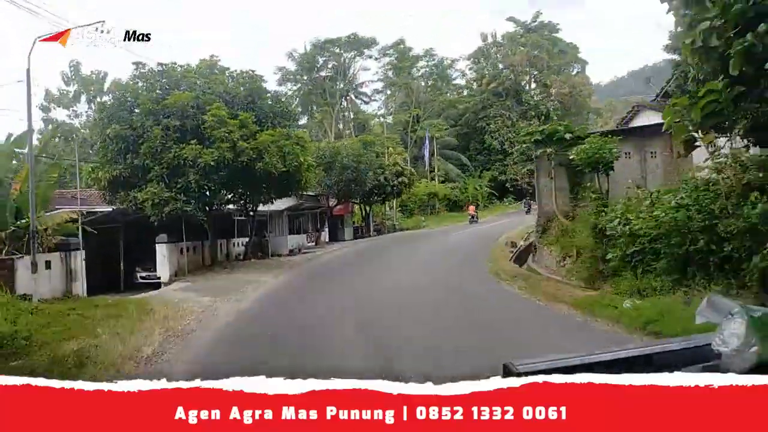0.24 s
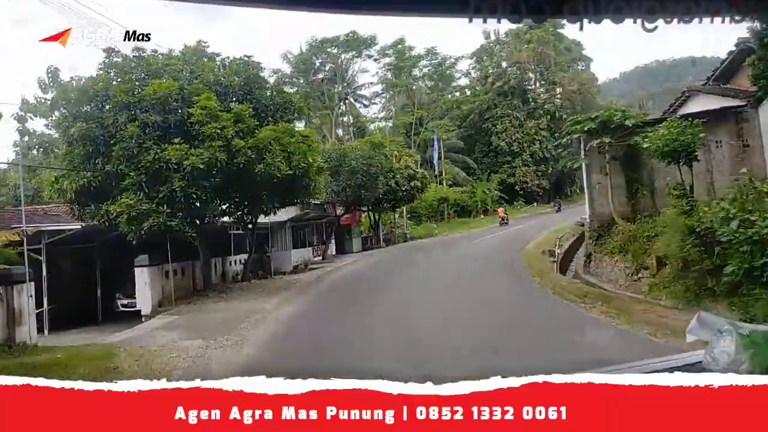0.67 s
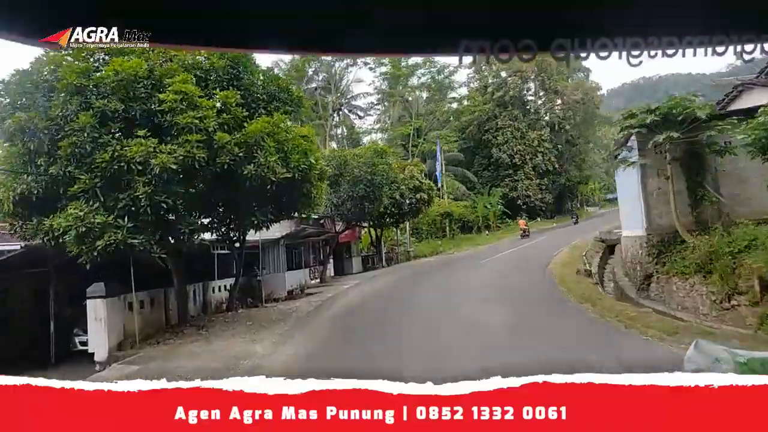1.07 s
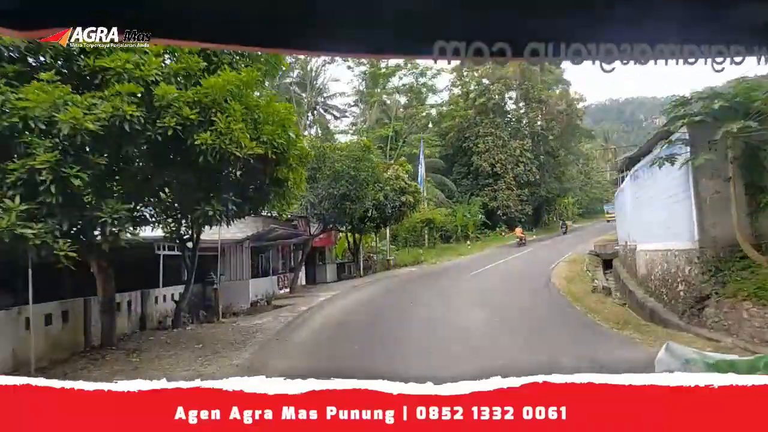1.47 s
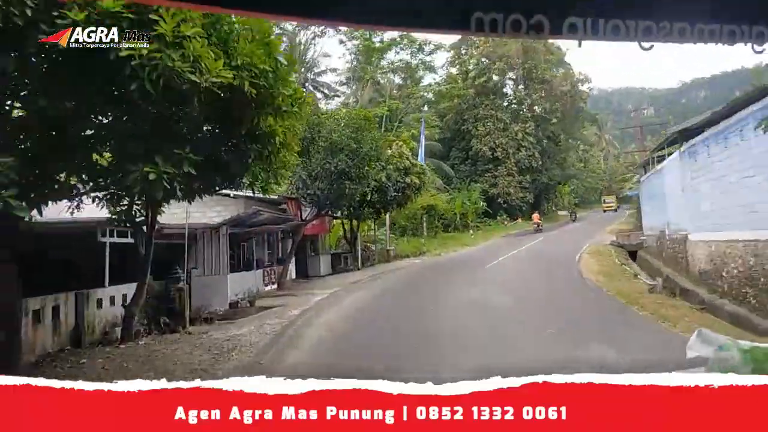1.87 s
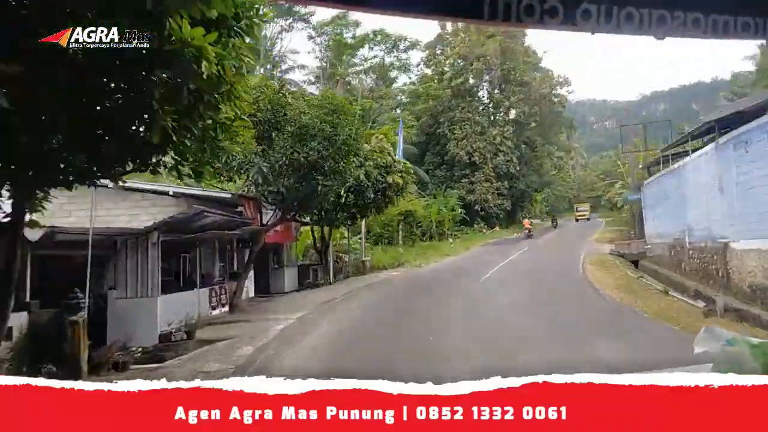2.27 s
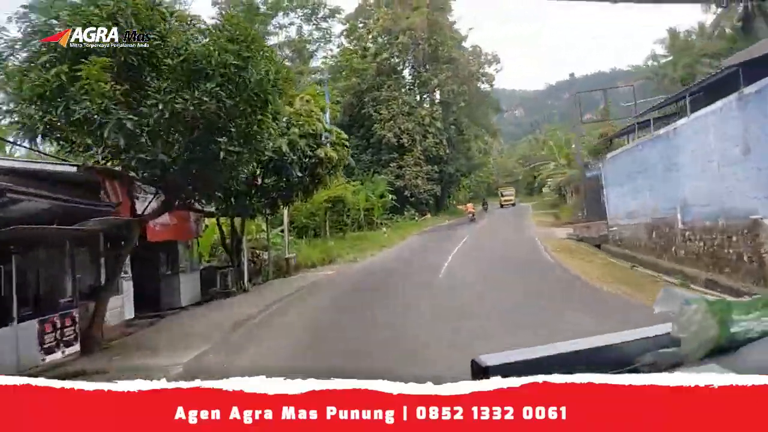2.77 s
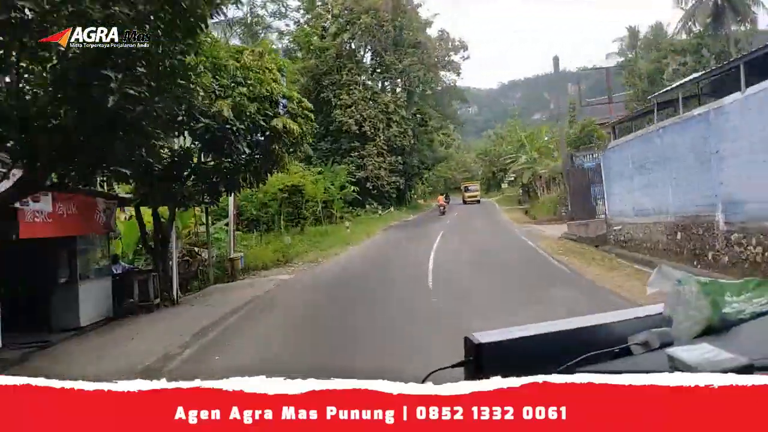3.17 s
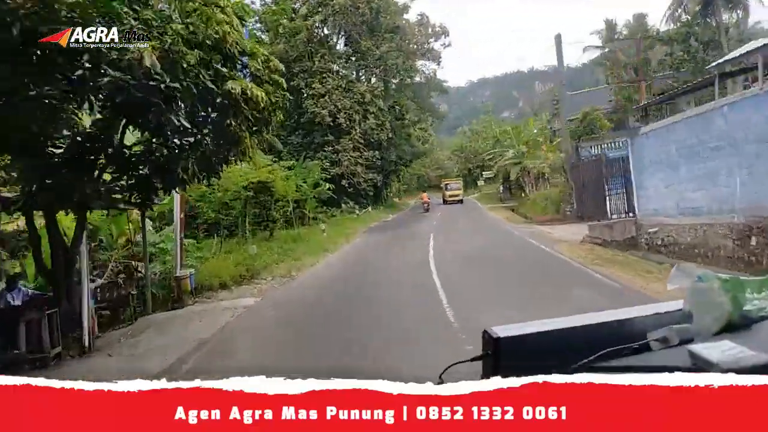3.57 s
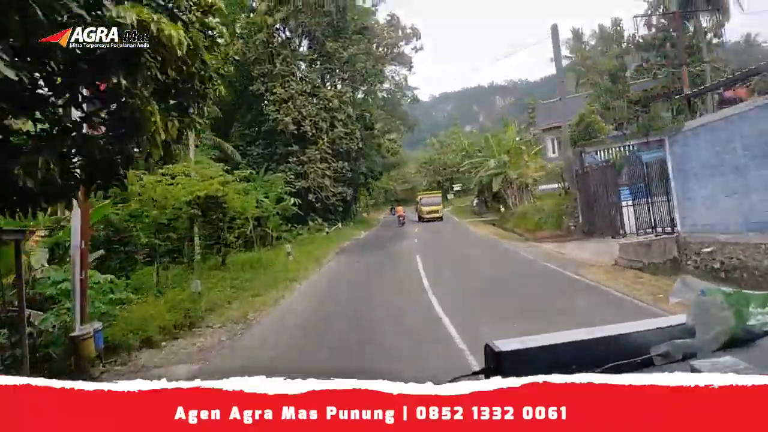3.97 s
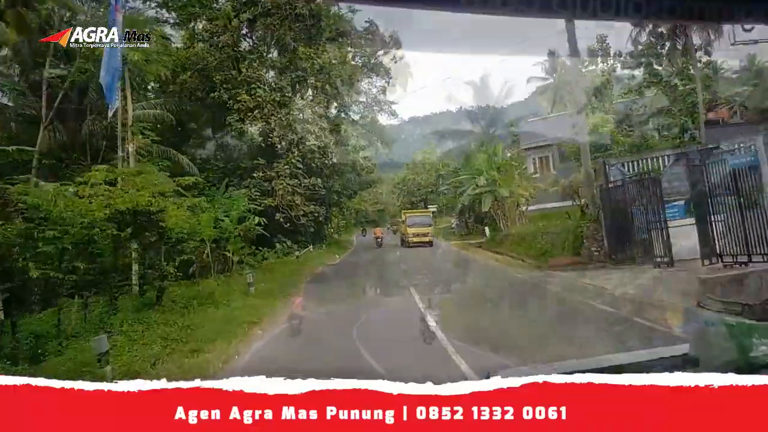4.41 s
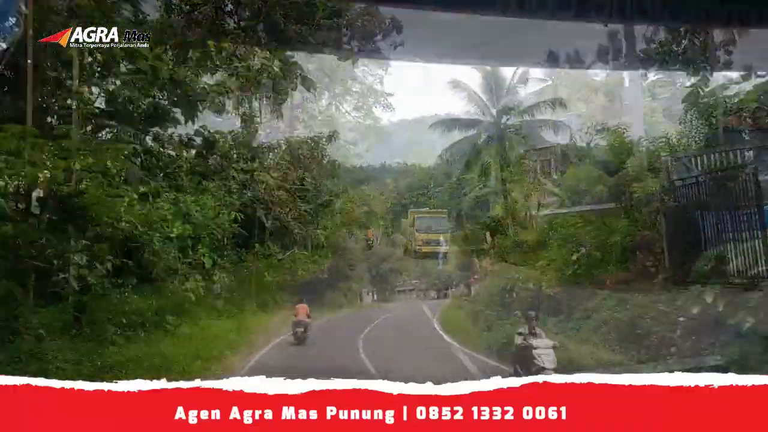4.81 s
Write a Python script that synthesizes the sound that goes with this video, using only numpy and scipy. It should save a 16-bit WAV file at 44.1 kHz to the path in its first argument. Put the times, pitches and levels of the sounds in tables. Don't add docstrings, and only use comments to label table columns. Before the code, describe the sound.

Steady bus interior noise heard from the dashboard: a deep throbbing diesel drone with muffled exhaust rush and faintly humming panels. It sags slightly, then swells and rises a little in pitch as the bus pulls, easing off after four and a half seconds. Soft body thumps, smooth tyre roar and light hiss surround it, with tiny trim clicks and short high squeaks near the end.

```python
import sys
import numpy as np
from scipy import signal
from scipy.fft import rfft, irfft, next_fast_len
from scipy.io import wavfile
from scipy.ndimage import uniform_filter1d

SR = 44100
rng = np.random.default_rng(int(sys.argv[2]) if len(sys.argv) > 2 else 0)


def linear_from_db(decibels):
    return 10 ** (np.asarray(decibels, float) / 20)


def pcm_store(signal):
    levels = np.round(np.clip(np.atleast_2d(signal), -1, 1) * 32767)
    wavfile.write(sys.argv[1], SR, levels.astype(np.int16).T)


N = 222602
T = np.arange(N) / SR

# time in seconds, four-stroke cycles per second.
ENGINE_SPEED = [(0.0, 12.21), (0.5, 12.08), (1.0, 12.0), (1.5, 12.11), (2.0, 12.32), (2.5, 12.49),
                (3.0, 12.76), (3.5, 12.93), (4.0, 13.06), (4.5, 13.08), (5.05, 13.23)]
# time in seconds, rms level in dB.
FIRING_LEVEL = [(0.0, -31), (0.2, -31), (0.4, -50), (0.55, -34), (0.68, -37), (0.88, -34.5), (1.38, -34),
                (1.6, -56), (1.78, -31.5), (2.0, -29), (2.25, -25), (2.7, -27), (3.5, -26), (3.72, -39),
                (4.02, -26), (4.22, -37.5), (4.4, -35), (5.05, -34.5)]
# multiple of the cycle rate, then level in dB coasting, pulling and cruising.
ENGINE_TONES = [(2, -38.5, -27, -33.5), (3, -42.5, -43.5, -36.5), (5, -49.5, -55.5, -39),
                (7, -42.5, -54, -38.5), (8, -54, -50.5, -56.5), (9, -46.5, -43, -46.5),
                (10, -54, -49.5, -45), (12, -50.5, -56.5, -66), (16, -79.5, -47, -53.5),
                (17, -60.5, -51.5, -63), (20, -54, -52.5, -52), (22, -58, -59.5, -58.5),
                (26, -62, -61, -58.5), (27, -57, -61, -51), (30, -58, -58.5, -60), (36, -75, -60.5, -89)]
# time in seconds, stage (0 coasting, 1 pulling, 2
# cruising), overall level in dB.
DRIVING = [
    (0, -0.3, 1),
    (1.6, 0, 0),
    (2.0, 1.5, 2),
    (3.1, 1.5, 1.5),
    (3.5, 1.5, 0.5),
    (4.1, 2, 1.5),
    (4.5, 2.11, -2.5),
    (5.05, 2.04, -7.5),
]
# frequency in Hz, level in dB per Hz.
BOOM_COLOUR = [(3, -14), (10, -10.5), (16, -8), (22, 2.5), (30, -9.5), (40, -14.5), (52, -30.5), (70, -38)]
RUMBLE_COLOUR = [(35, -20.5), (55, -2.5), (85, 6), (100, -8.5), (140, -7.5), (175, -11.5), (210, -11),
                 (260, -16), (350, -18), (420, -23.5), (650, -27)]
EXHAUST_COLOUR = [(300, -20), (430, 0), (600, 0.5), (750, -0.5), (950, 0), (1100, -4.5), (1300, -2),
                  (1600, -15), (2200, -37.5)]
TYRE_COLOUR = [(1000, -6), (1400, -3), (1800, 1.06), (2300, 1.2), (2600, -3), (3000, -11), (3700, -21.5),
               (4800, -34), (6500, -43), (8500, -47), (16000, -54)]
HISS_COLOUR = [(2500, 7), (4500, -4), (7000, -10.5), (8600, -12.5), (10500, -1.8), (12600, -4.5),
               (13400, -8.5), (15700, -8), (17000, -31)]
# time in seconds, peak of the bright part in dB, level of the dull part in dB.
TRIM_TICKS = [(.031, -53.5, -77.5), (.2, -64, -80), (.492, -60, -78), (.66, -64, -82), (.7, -75.5, -87),
              (.93, -69, -80), (1.0, -64, -83), (1.08, -66, -82), (1.345, -68, -73.5), (1.43, -71, -76),
              (1.62, -58.5, -74.5), (1.97, -68, -78), (2.15, -57, -68), (2.268, -52, -68.5),
              (2.497, -61, -85), (2.76, -64, -81), (2.797, -57, -79), (3.372, -63, -71), (3.52, -64.5, -69),
              (3.692, -58, -69), (3.948, -64, -71.5), (4.77, -61.5, -68), (5.029, -61, -80)]
# start in seconds, length in seconds, pitch in Hz, rms level in dB, roughness (0 to 1).
TRIM_SQUEAKS = [(2.01, .08, 1875, -49, .3), (2.265, .14, 1900, -51, .2), (4.22, .12, 1630, -53, .15),
                (4.33, .1, 1640, -49.5, .2), (4.4, .07, 2250, -53, .3), (4.5, .06, 2470, -52, .15),
                (4.755, .04, 2595, -42, .5), (4.799, .014, 2580, -43, .4), (4.745, .07, 2200, -48, .95),
                (4.77, .045, 3250, -57, .95), (4.94, .04, 2840, -51, .5), (4.975, .045, 2270, -47, .6),
                (4.975, .09, 2460, -45, .9), (4.99, .08, 2830, -52, .9), (5.02, .04, 1835, -48, .4),
                (4.98, .08, 3400, -56, .8), (4.8, .2, 595, -54, .2)]
# pitch in Hz, width in Hz, level in dB against the rush.
HUMMING_PANELS = [(599.6, 10, -16), (673, 14, -12), (921.5, 6.9, -15), (976, 18, -19), (1327, 21, -17.5),
                  (1393, 7, -15), (1819, 20, -15)]
# multiple of the cycle rate, centre in Hz,
# half width in Hz, rms level on top in dB.
CAB_RESONANCES = [(15, 195.5, 3.3, -45.5), (18, 217.5, 4.0, -43), (18, 227, 4.96, -45),
                  (24, 290, 3.8, -53.5), (24, 297.5, 4.7, -48), (24, 312, 3.1, -49.5)]
# time in seconds, level at the top in dB.
ROAD_BUMPS = [(.07, -22.5), (.27, -18), (.42, -24.5), (.53, -27), (.66, -18), (.94, -22), (1.08, -31.5),
              (1.27, -26.5), (1.39, -27.5), (1.72, -24), (1.82, -24.5), (1.99, -22), (2.16, -17.5),
              (2.37, -16.5), (2.5, -18.5), (2.7, -21), (2.8, -17.5), (2.95, -20.5), (3.07, -23.5),
              (3.18, -21.5), (3.31, -14), (3.502, -17), (3.73, -27), (3.88, -22.5), (4.08, -16.5),
              (4.15, -20.5), (4.3, -22), (4.57, -27), (4.69, -25), (4.92, -25.5)]
# time in seconds, frequency in Hz.
BOOM_PITCH = [(0, 24.5), (0.5, 26.5), (0.8, 23.6), (2.7, 23.5), (2.9, 21), (3.2, 23), (3.5, 22),
              (4.05, 23.4), (4.2, 19.6), (4.7, 20), (5.05, 24.5)]
# time in seconds, level in dB.
ROAD_PULL = [(0, -55.5), (1.1, -56.5), (1.58, -59), (1.72, -55), (1.8, -50), (2.05, -45.5), (2.22, -46.5),
             (2.32, -44.5), (2.66, -46), (2.8, -41.5), (3.1, -41), (3.17, -44), (3.35, -40.5),
             (3.78, -42.5), (4.0, -39), (4.31, -45), (4.55, -44), (5.05, -42)]


def in_time(rows):
    s, *columns = np.transpose(rows)
    return [np.interp(T, s, column) for column in columns]


def rms_one(x):
    return x / np.sqrt(np.mean(x ** 2) + 1e-20)


def drift(rate_hz):
    r = np.exp(-2 * np.pi * rate_hz * 40 / SR)
    white = rng.standard_normal(N // 40 + 2002)
    slow = signal.lfilter([1], [1, -2 * r, r * r], white)[2000:]
    return np.interp(np.arange(N) / 40, np.arange(len(slow)), rms_one(slow - slow.mean()))


def coloured(colour, patchy_db, rate_hz):
    size = next_fast_len(N)
    octave = np.log2(np.maximum(np.arange(size // 2 + 1) * SR / size, 1))
    hz, db = np.transpose(colour)
    shape = linear_from_db(np.interp(octave, np.log2(hz), db, left=-90, right=-90))
    noise = rfft(rng.standard_normal(size)) * shape
    out = np.zeros(N)
    lowest = np.floor(np.log2(hz[0] * .95))
    for centre in np.arange(lowest, 14.5, .5)[:14]:
        share = np.clip(1 - 2 * np.abs(octave - centre), 0, 1)
        out += irfft(noise * share, size)[:N] * linear_from_db(patchy_db * drift(rate_hz))
    return rms_one(out)


def hum(white, hz, width_hz):
    r = np.exp(-np.pi * width_hz / SR)
    section = [1, 0, -1, 1, -2 * r * np.cos(2 * np.pi * hz / SR), r * r]
    return rms_one(signal.sosfilt([section, section], white))


def follow(level_db, pull_share, engine_share):
    pull_db, = in_time(ROAD_PULL)
    _, overall_db = in_time(DRIVING)
    mean_pull_db = -48
    return level_db + pull_share * (pull_db - mean_pull_db) + engine_share * overall_db


def air_hiss():
    level_db = follow(-73.5, pull_share=.28, engine_share=.1) + 3.5
    return linear_from_db(level_db) * coloured(HISS_COLOUR, patchy_db=1.5, rate_hz=6.8)


def floor_rumble():
    level_db = follow(-36, pull_share=.14, engine_share=1.05) + .17
    return linear_from_db(level_db) * coloured(RUMBLE_COLOUR, patchy_db=-1, rate_hz=12)


def body_boom():
    rise_s, fall_s, calm_db = .03, .043, -30.5
    power = linear_from_db(2 * calm_db) * np.ones(N)
    for s, db in ROAD_BUMPS:
        width_s = np.where(T < s, rise_s, fall_s)
        power += linear_from_db(2 * db) * np.exp(-((T - s) / width_s) ** 2)
    pitch_hz, = in_time(BOOM_PITCH)
    swing = np.sqrt(2) * np.sin(2 * np.pi * np.cumsum(pitch_hz) / SR)
    boom = linear_from_db(1.5) * swing + coloured(BOOM_COLOUR, patchy_db=-4.5, rate_hz=.98)
    strength = uniform_filter1d(uniform_filter1d(boom ** 2, size=3000), size=3000)
    return np.sqrt(power) * rms_one(boom / strength ** .58)


def tyre_roar():
    pull_db, = in_time(ROAD_PULL)
    return linear_from_db(pull_db) * coloured(TYRE_COLOUR, patchy_db=1, rate_hz=5.9)


def trim_ticks():
    s, bright_db, dull_db = np.transpose(TRIM_TICKS)
    knocks = np.zeros((2, N))
    knocks[:, np.round(s * SR).astype(int)] = linear_from_db([bright_db - 7, dull_db + 5])
    rise, fall = np.exp(-1 / (.0032 * SR)), np.exp(-1 / (.027 * SR))
    bright, dull = signal.lfilter([1 - rise], np.convolve([1, -rise], [1, -fall]), knocks + 1e-18)
    white = rng.standard_normal((2, N))
    high = signal.sosfilt(signal.butter(3, [9300, 13000], "band", fs=SR, output="sos"), white[0])
    mid = signal.sosfilt(signal.butter(2, [2500, 6000], "band", fs=SR, output="sos"), white[1])
    return bright * rms_one(high) + dull * rms_one(mid)


def trim_squeaks():
    out, white = np.zeros(N), rng.standard_normal(N)
    for s, length_s, hz, db, rough in TRIM_SQUEAKS:
        span = slice(round((s - .05) * SR), round((s + length_s) * SR))
        t = T[span]
        shape = np.clip(np.minimum(t - s, s + length_s - t) / .004, 0, 1)
        tone = np.sqrt(2 - 2 * rough) * np.sin(2 * np.pi * hz * t)
        ringing = np.sqrt(rough) * hum(white[span], hz, width_hz=260 * rough + 20)
        out[span] += linear_from_db(db) * shape * (tone + ringing)
    return out


def trim_creak():
    first_slip_s, slips_per_s, pitch_hz = 4.99, 90.5, 2575
    age = T - first_slip_s
    slips = (.5 + .5 * np.cos(2 * np.pi * slips_per_s * age)) ** 1.5
    slips *= age > -.5 / slips_per_s
    level_db = -42 + 120 * np.maximum(age, 0)
    return linear_from_db(level_db) * 2 * slips * np.sin(2 * np.pi * pitch_hz * T + .63 * drift(60))


def exhaust(phase):
    pulsing = 1 + .08 * np.sin(6 * phase)
    rush = pulsing * coloured(EXHAUST_COLOUR, patchy_db=-.3, rate_hz=4.3)
    white = rng.standard_normal(N)
    for hz, width_hz, db in HUMMING_PANELS:
        rush += linear_from_db(db) * hum(white, hz, width_hz)
    dull = signal.sosfiltfilt(signal.butter(2, 800, fs=SR, output="sos"), rush)
    bright = rush - dull
    coasting = np.clip(1 - in_time(DRIVING)[0], 0, 1)
    level_db = follow(-48, pull_share=.6, engine_share=.6)
    return linear_from_db(level_db) * (linear_from_db(3.8 * coasting) * dull + linear_from_db(-2.5 * coasting) * bright)


def engine_turning():
    cycle_hz, = in_time(ENGINE_SPEED)
    return 2 * np.pi * np.cumsum(cycle_hz) / SR


def engine(phase):
    cycle_hz, = in_time(ENGINE_SPEED)
    stage, overall_db = in_time(DRIVING)
    firing_db, = in_time(FIRING_LEVEL)
    out = linear_from_db(firing_db) * np.sin(6 * phase + .15 * drift(3))

    for order in (15, 18, 24):
        lift = np.zeros(N)
        for row_order, hz, half_width_hz, db in CAB_RESONANCES:
            if round(row_order) == order:
                lift += linear_from_db(db) / (1 + ((order * cycle_hz - hz) / half_width_hz) ** 4)
        out += lift * np.sin(order * phase + order + .12 * drift(3))

    for order, *stage_db in ENGINE_TONES:
        level_db = np.interp(stage, np.arange(3), stage_db) + overall_db + 1.3 * drift(1.4)
        start = rng.uniform(0, 2 * np.pi)
        out += linear_from_db(level_db) * np.sin(round(order) * phase + start + .19 * drift(1.6))

    out += linear_from_db(-50 - 12.5 * stage ** 2) * np.sin(13.5 * phase)
    return np.sqrt(2) * out


def scene():
    phase = engine_turning()
    road = body_boom() + floor_rumble() + tyre_roar()
    trim = trim_ticks() + trim_squeaks() + trim_creak()
    return (air_hiss() + road + trim + exhaust(phase) + engine(phase))[None]


def roll_off(x):
    return signal.sosfilt(signal.butter(12, 15720, fs=SR, output="sos"), x)


def record(dry):
    mix = .5 * np.tanh(dry / .5) - .0016
    return roll_off(mix)


dry = scene()
out = record(dry)
pcm_store(out)
```